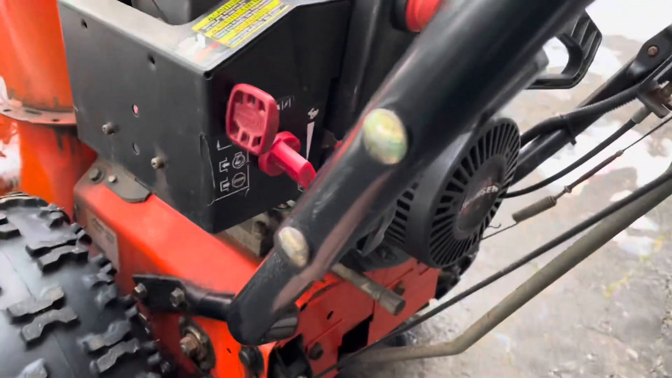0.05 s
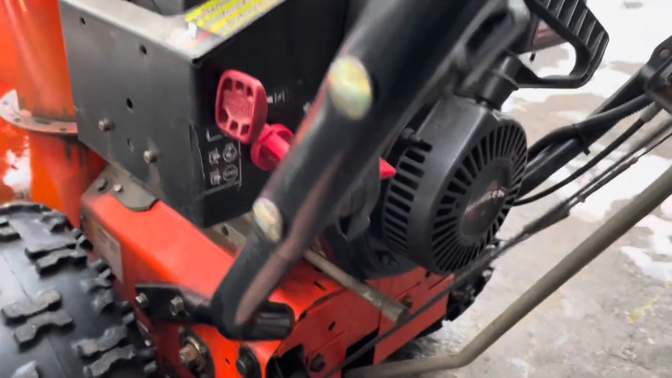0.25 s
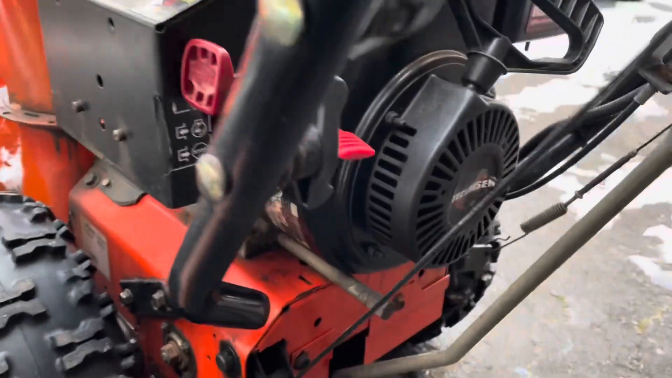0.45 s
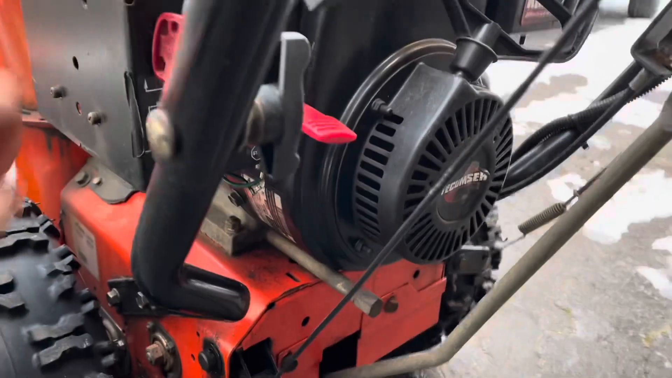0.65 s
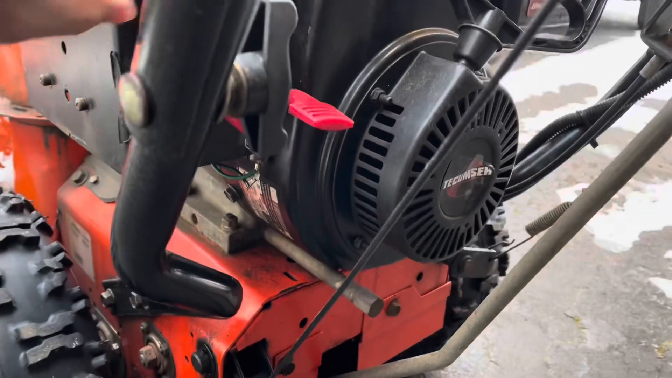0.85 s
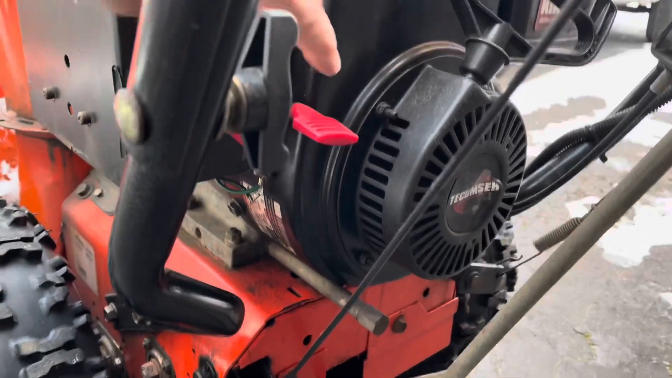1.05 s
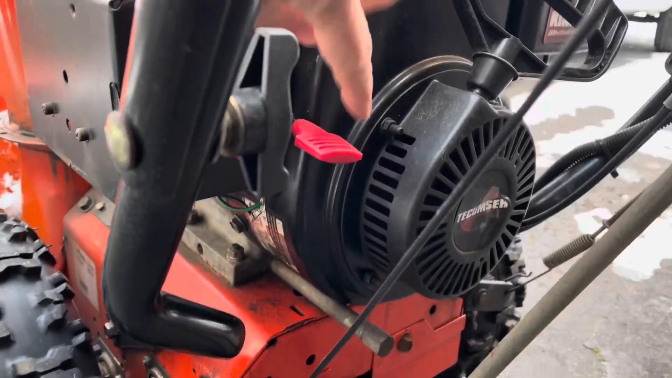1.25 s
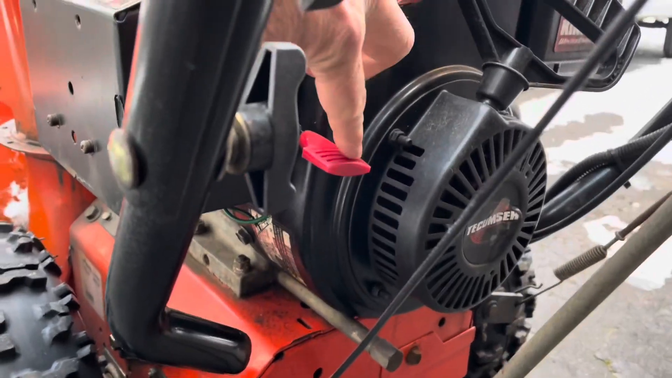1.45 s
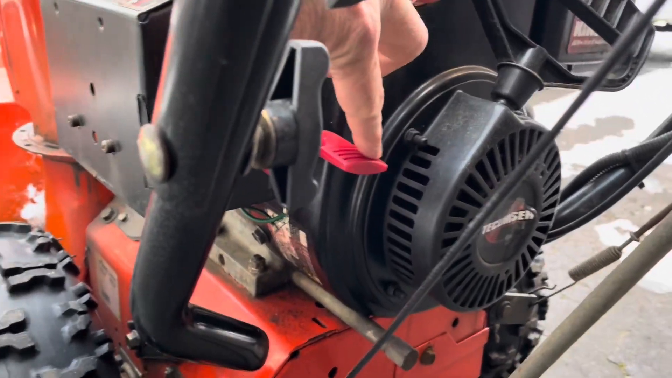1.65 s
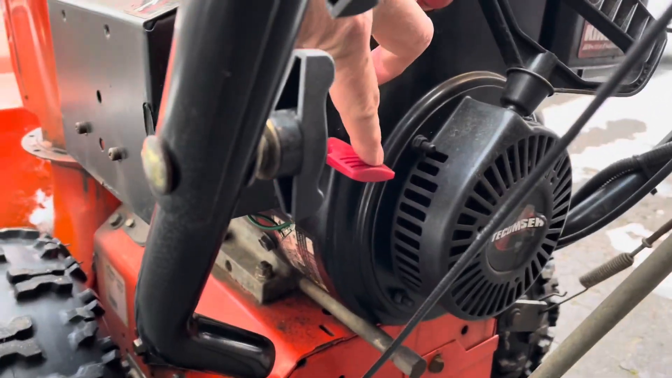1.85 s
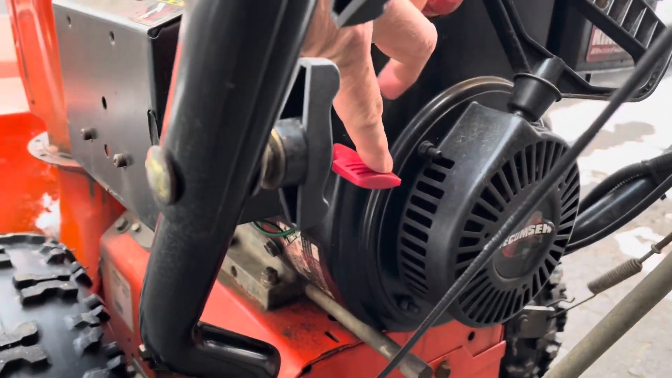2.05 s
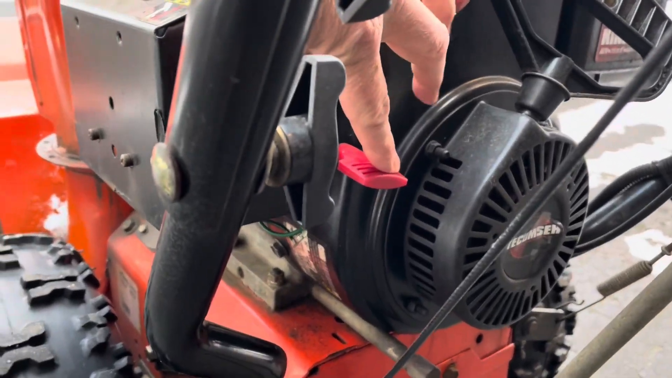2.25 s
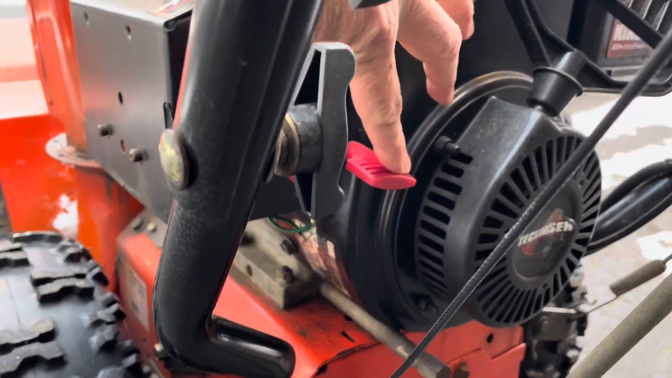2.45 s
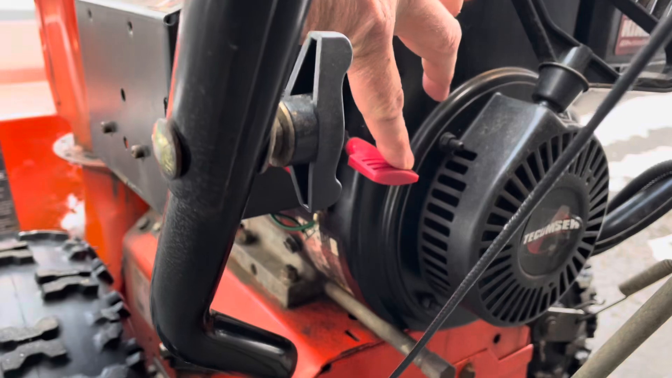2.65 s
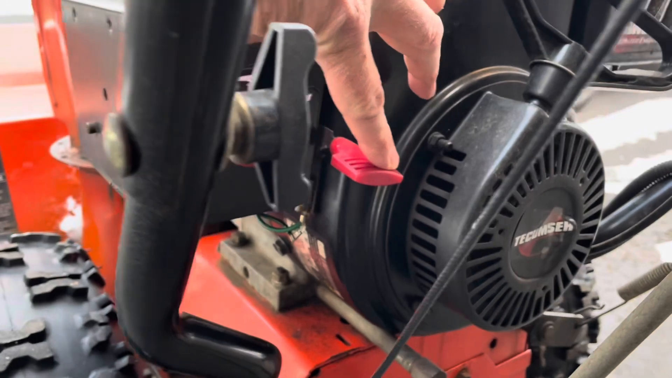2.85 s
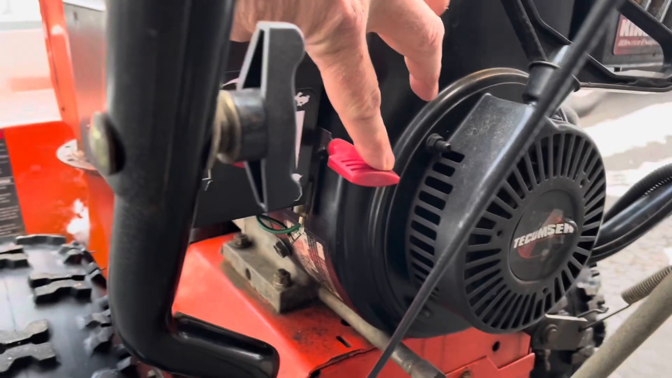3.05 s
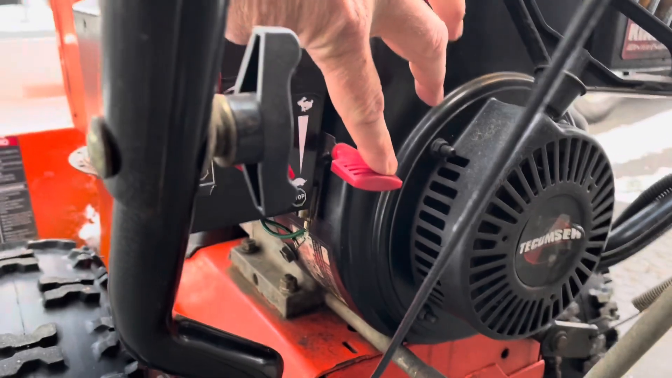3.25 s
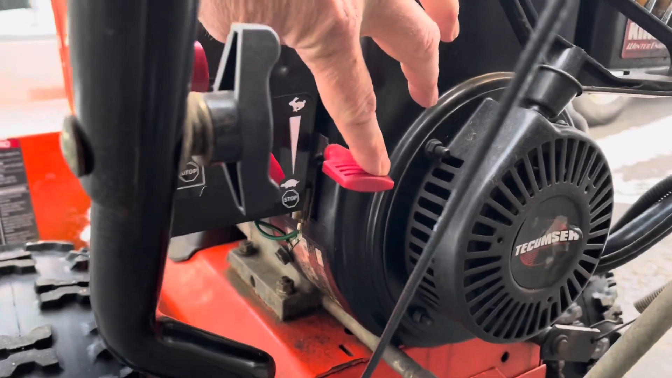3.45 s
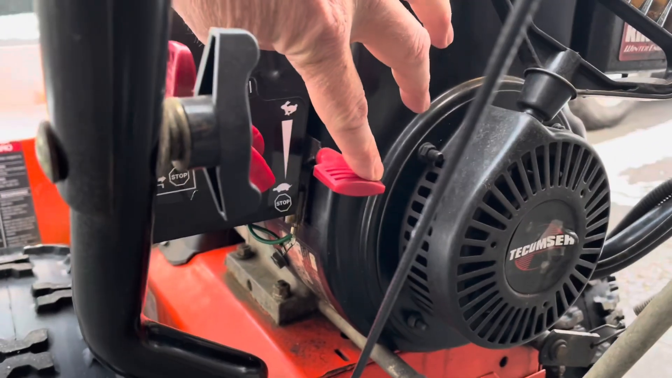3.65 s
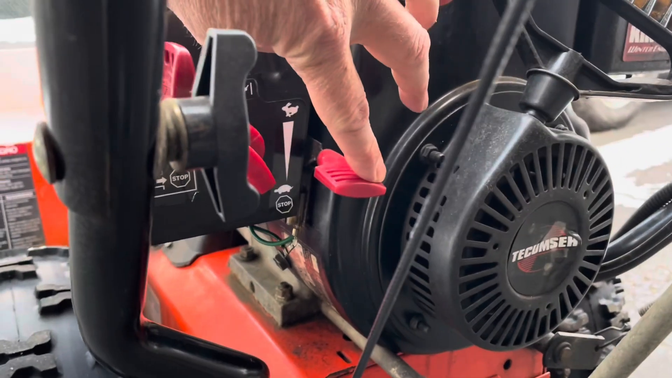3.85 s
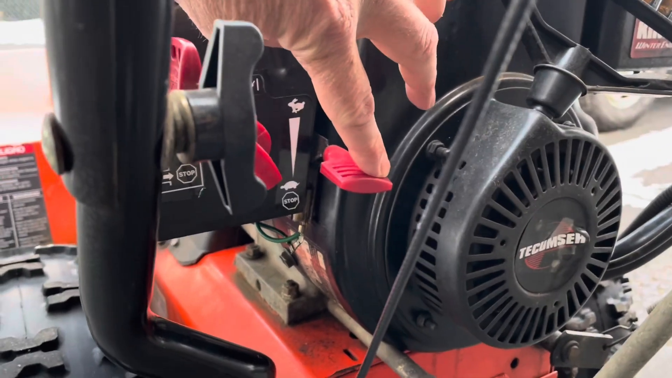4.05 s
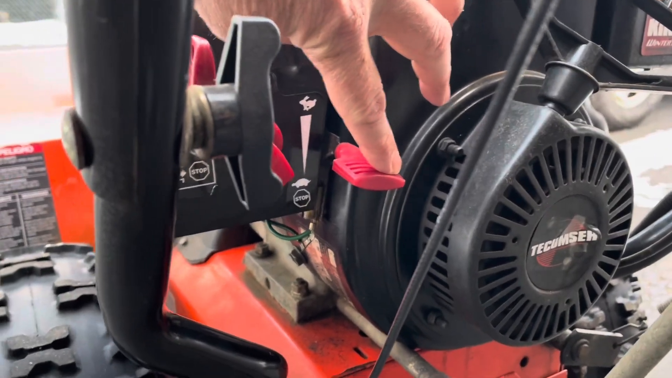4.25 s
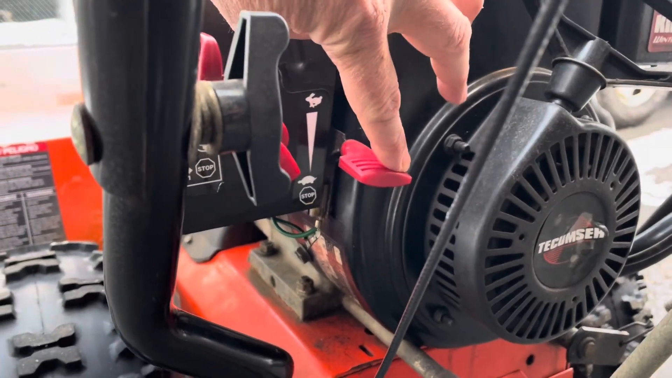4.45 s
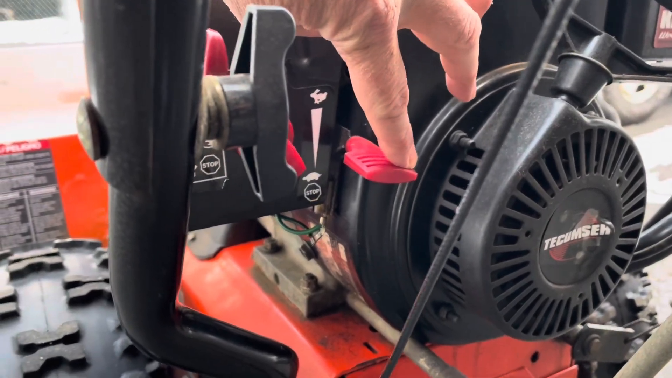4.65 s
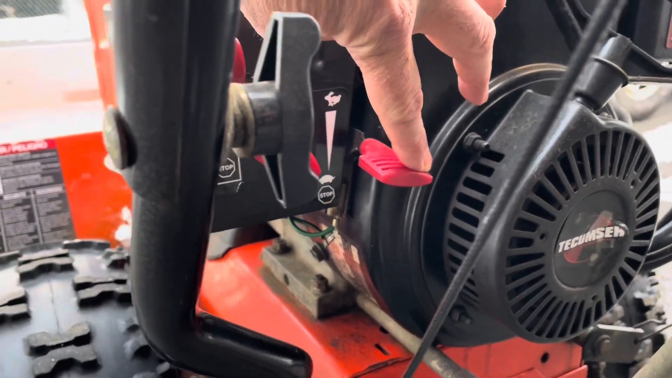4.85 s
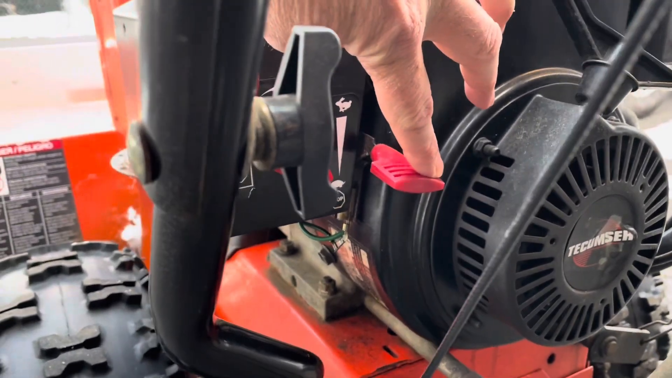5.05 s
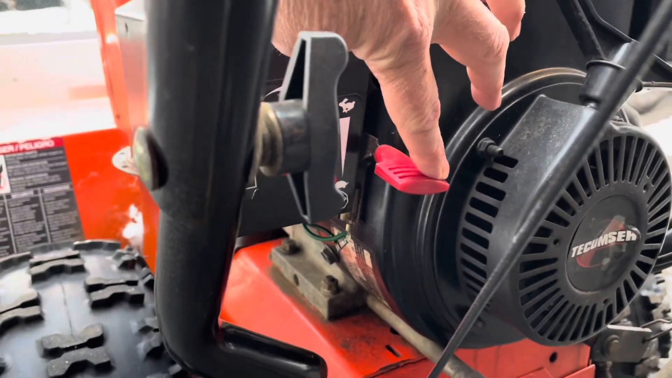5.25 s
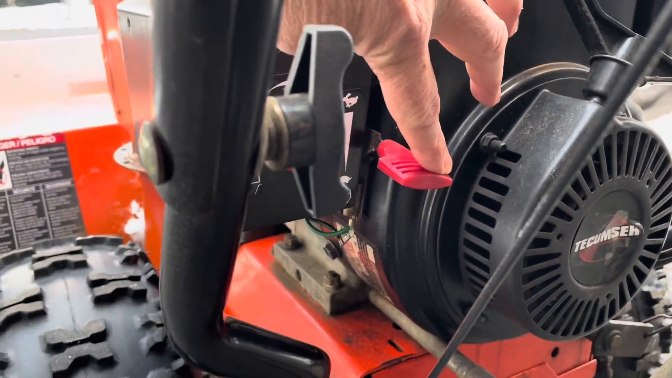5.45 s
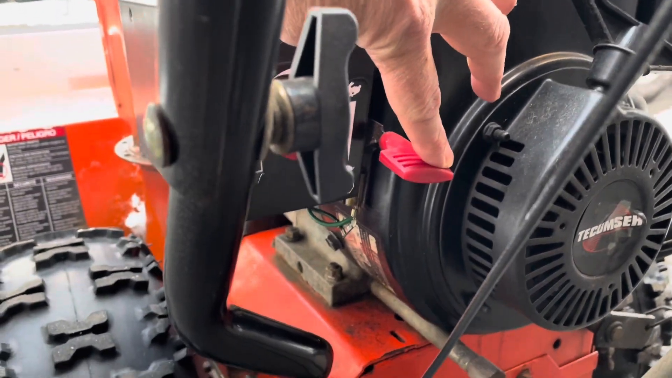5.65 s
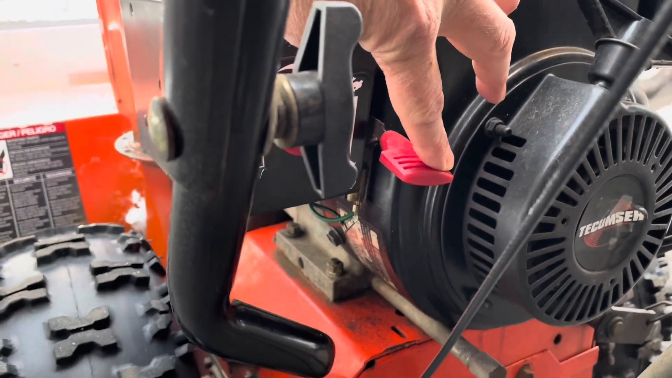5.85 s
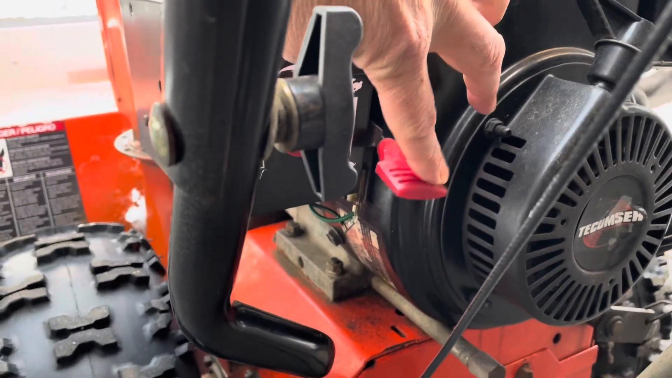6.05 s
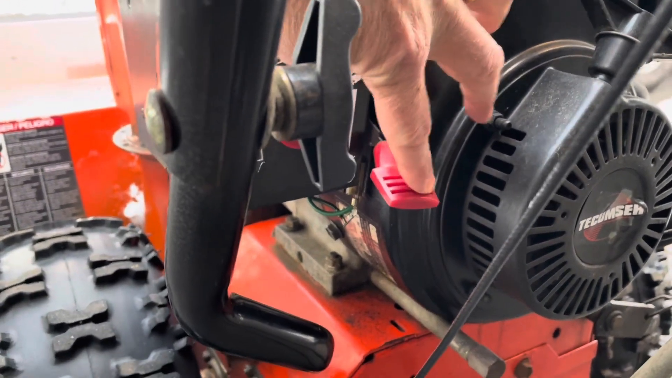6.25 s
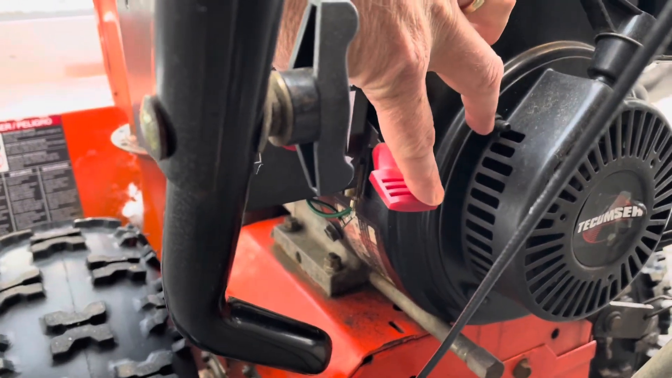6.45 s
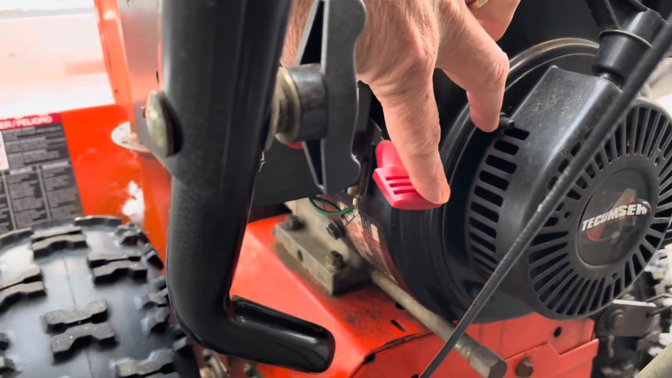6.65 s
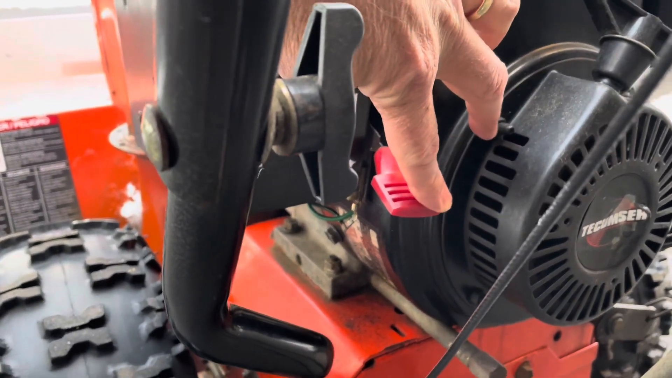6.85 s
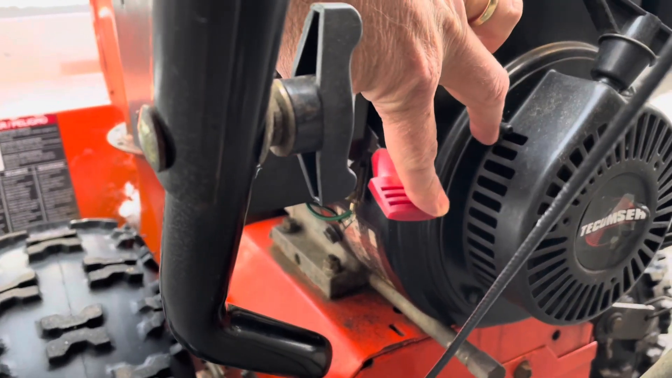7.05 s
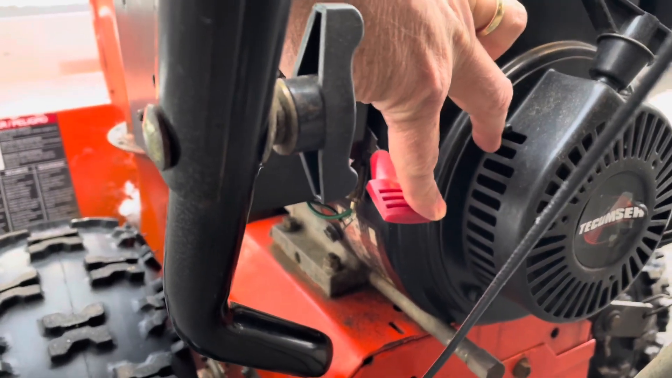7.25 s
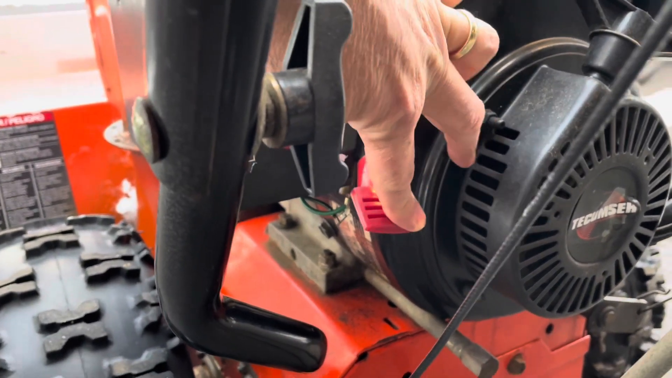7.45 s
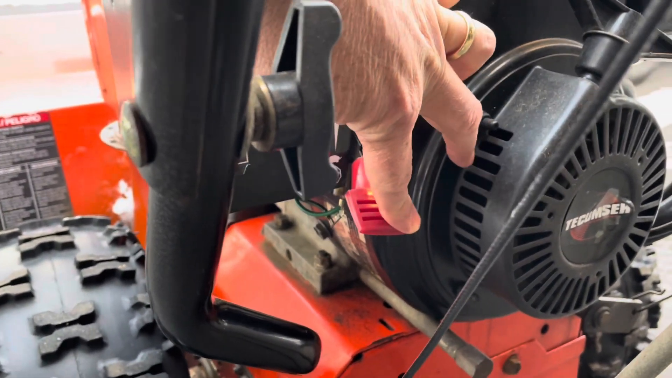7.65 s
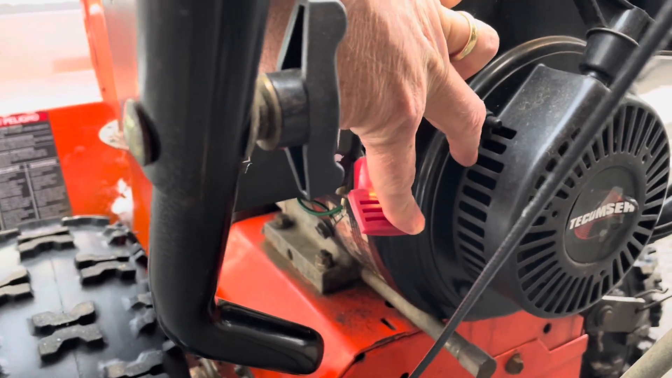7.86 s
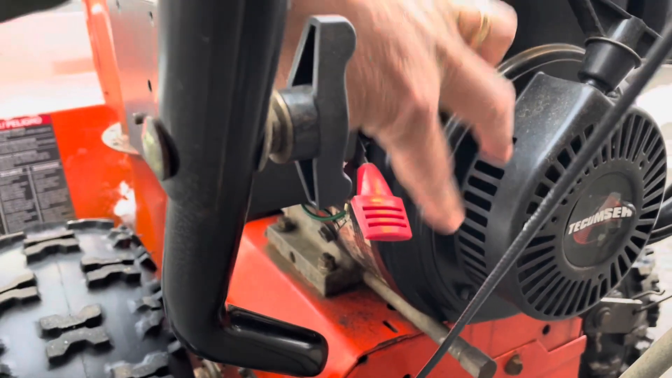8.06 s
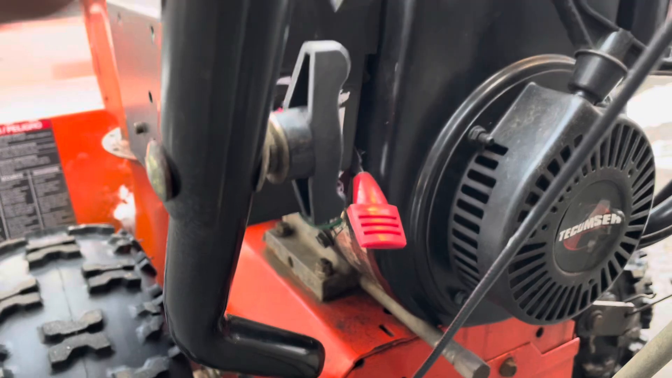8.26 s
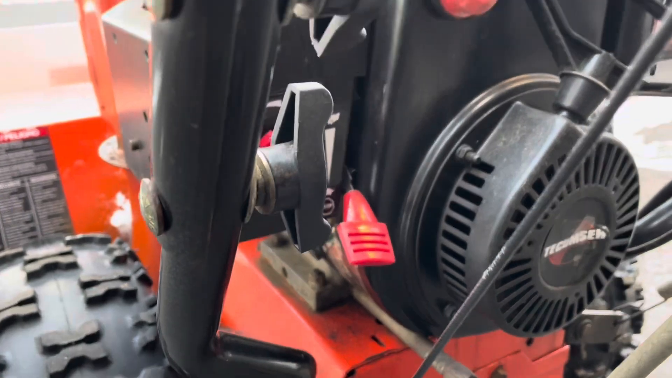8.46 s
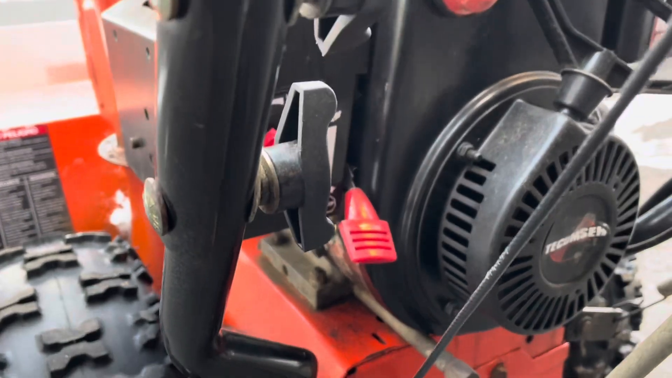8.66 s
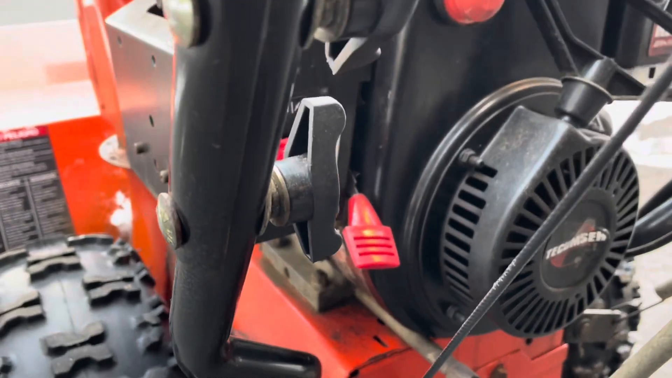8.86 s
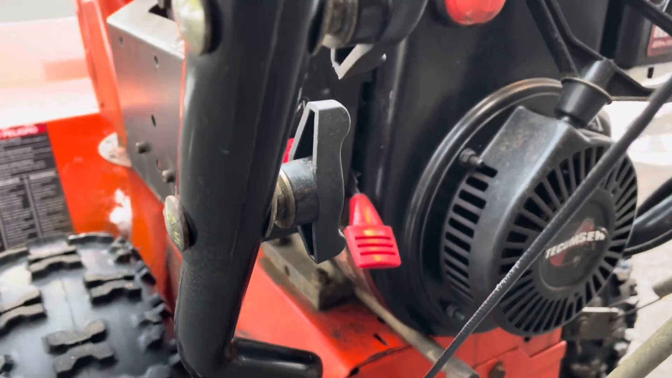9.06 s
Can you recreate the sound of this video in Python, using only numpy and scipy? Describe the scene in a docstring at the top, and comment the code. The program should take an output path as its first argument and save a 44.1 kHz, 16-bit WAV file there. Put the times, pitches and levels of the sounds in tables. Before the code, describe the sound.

Lumpy small-engine idle, popping and rattling with occasional misfires, winds down into spaced breathy puffs, two late sputters, metal knocks and dry clicks.

```python
"""A snowblower's single-cylinder four-stroke engine idles close by, missing a firing now and then.
The throttle lever is pushed to stop: the engine coasts down in slowing chuffs, with two late sputters,
and comes to rest among metal knocks and dry clicks. Each firing is a pressure pulse that barks through
muffler resonances and spits a jet of noise; struck casing modes make the clatter of valve gear and loose
metal, and coloured noise the rush of the cooling fan. Crank speed times and scales these sources."""
import sys
import numpy as np
from scipy import signal
from scipy.fft import rfft, irfft, next_fast_len
from scipy.io import wavfile
from scipy.ndimage import map_coordinates

SR = 44100
rng = np.random.default_rng(int(sys.argv[2]) if len(sys.argv) > 2 else 0)


def waveform_to_disk(signal):
    """Save audio, clipped to [-1, 1], as 16-bit WAV at the path in sys.argv[1]."""
    frames = np.transpose(np.atleast_2d(signal))
    scaled = np.clip(frames, -1, 1) * 32767
    samples = np.round(scaled).astype(np.int16)
    wavfile.write(sys.argv[1], SR, samples)


N = 402191
TIME, HZ = np.arange(N) / SR, np.fft.rfftfreq(2 * N, 1 / SR)
# time within a single event [s]: a quarter and a twentieth of a second long
AGE, BRIEF = TIME[:SR // 4], TIME[:SR // 20]

# crank speed until the ignition is cut at the last row: (time [s], speed [rpm])
CRANK_SPEED = [(0.0, 2051.9), (0.5, 2031.6), (1.6, 1865.7), (2.7, 1890.5), (3.3, 1852.1), (4.25, 1824.7),
               (5.08, 1869.1), (5.72, 1855.9), (6.3, 1922.9), (6.68, 1797.2), (7.03, 1805.6)]
IDLE_RPM = 1860
# late puffs of gas in the muffler: (time [s], relative pop level [dB], relative hiss level [dB])
LATE_PUFFS = [(8.373, -25, 3), (8.605, -27.5, -1)]
# charges that burn lazily and leave as a dull puff: (time [s], share of a full bark)
LAZY_CHARGES = [(.79, 0.86), (1.285, .7), (3.91, 0.8), (4.57, 0.5), (6.365, 0.86), (6.555, 0.9)]
# muffler resonances: (frequency [Hz], width [Hz], level [dB])
MUFFLER_MODES = [(71.7, 8.6, 4), (130.5, 36.4, 4.5), (230.6, 82.5, 8.5), (327.7, 148, 11), (458, 92, 15),
                 (718, 37, 13.5)]
# relative level of the gas hiss: (time [s], level [dB])
HISS_LEVEL = [(0, 0), (.75, 5.5), (1.4, -1.5), (3, 1.5), (5, 2), (5.6, 4), (6.3, 4.5)]


def amp(db):
    """Level and amplitude: decibels become a gain."""
    return 10 ** (np.asarray(db) / 20)


def evened(x):
    """Normalisation: the sound is scaled to an rms of 1."""
    return x / np.sqrt(np.mean(x ** 2) + 1e-20)


def curve(rows, at):
    """Linear interpolation: reads every column of a table along its first."""
    x, *columns = np.transpose(rows)
    return [np.interp(at, x, column) for column in columns]


def colour(points):
    """Spectral envelope: a gain at every frequency, in straight lines of dB over log frequency."""
    hz, db = np.transpose(points)
    return amp(np.interp(np.log(HZ + 1), np.log(hz), db))


def resonance(hz, width, db):
    """Damped resonance: the complex response of one mode, greatest at its own frequency."""
    return amp(db) * 1j * HZ * width / (hz ** 2 - HZ ** 2 + 1j * HZ * width)


def filtered(x, response):
    """Linear filtering: multiplies the spectrum of a sound by a frequency response."""
    size = next_fast_len(N + SR // 2, True)
    gain = np.interp(np.fft.rfftfreq(size, 1 / SR), HZ, response)
    return irfft(rfft(x, size) * gain, size)[..., :N]


def noise(response):
    """Uncorrelated turbulence: two independent noises of one colour."""
    return evened(filtered(rng.standard_normal((2, N)), response))


def add(mix, s, sound):
    """Superposition: mixes a sound in at a time in seconds."""
    part = mix[max(round(s * SR), 0):][:len(sound)]
    part += sound[:len(part)]


def puffs(times, sizes, rise_s):
    """Pressure pulses that swell and die away; a longer time constant gives a softer pulse."""
    out = np.zeros(N)
    for s, size, tau in zip(times, sizes, rise_s * np.ones(len(times))):
        add(out, s, size * (AGE / tau) ** 2 * np.exp(-AGE / tau))
    return out


def crank():
    """Flywheel inertia against dry friction and fan drag: speed as a share of idle, and cycles of two turns."""
    friction_rpm_per_s, drag_per_s = 618.93, .1668
    cycles_before_first_opening = .2862
    coasted = np.maximum(TIME - CRANK_SPEED[-1][0], 0)
    unbraked = curve(CRANK_SPEED, TIME)[0]
    rpm = np.maximum(unbraked * np.exp(-drag_per_s * coasted) - friction_rpm_per_s * coasted, 1)
    return rpm / IDLE_RPM, np.cumsum(rpm) / (2 * 60 * SR) - cycles_before_first_opening


def driven(pace, db, power):
    """Power law of speed: a gain that follows the crank, then fades out from a fixed time near the end."""
    fade_from_s, fade_db_per_s = 8.58, 51
    return amp(db - fade_db_per_s * np.maximum(TIME - fade_from_s, 0)) * pace ** power


def sweep_db(cycle):
    """Piston displacement: the level of gas flow swells and ebbs once in each cycle."""
    top_db, top_share_of_cycle = -6, 0.2
    swell_db_per_cycle, ebb_db_per_cycle = 109, 25.5
    since = (cycle - top_share_of_cycle) % 1
    return top_db - np.minimum(ebb_db_per_cycle * since, swell_db_per_cycle * (1 - since))


def yard(level_db=-56):
    """Ambient noise: a steady random background with a fixed spectrum."""
    # background spectrum: (frequency [Hz], relative density [dB per Hz])
    yard_colour = [(20, -7), (80, 4), (250, -4), (900, -17), (2500, -20), (6000, -24), (11000, -26),
                   (13000, -18), (16000, -32)]
    return amp(level_db) * noise(colour(yard_colour))


def garage(x, t60=0.059, wet_db=-17):
    """Diffuse reverberation: dull scattered echoes from floor and walls, decaying exponentially."""
    taps = rng.standard_normal((2, len(AGE))) * amp(-60 * AGE / t60) * (AGE > .008)
    echo = signal.oaconvolve(x, taps / np.linalg.norm(taps[0]), axes=1)[:, :N]
    return amp(wet_db) * filtered(echo, 1 / (1 + HZ / 5000))


def microphones(x, direct=0.047):
    """Pressure gradient: the difference of two close ports is a quarter cycle off their sum, partly diffuse."""
    # response to the sum of the ports: (frequency [Hz], level [dB])
    sum_response = [(25, -12), (42, 2.5), (7000, -0.5), (8200, -4.5), (9100, -19.5), (10000, -0.5),
                    (11000, -2)]
    # response to the difference of the ports: (frequency [Hz], level [dB])
    difference_response = [(30, -36), (120, -16), (300, -18.5), (700, -6.5), (1200, -8.5), (2500, -2.5),
                           (5000, -4), (7500, 1), (9500, 6), (11500, -3), (13000, -29)]
    # how much louder the left port is than the right: (frequency [Hz], level [dB])
    left_over_right = [(60, -1), (120, 0.5), (240, 1.5), (480, -0.5), (950, 1.0), (1890, -1.0), (3770, 2),
                       (7520, 1.0), (15000, -0.5)]
    mid = filtered(x[0], colour(sum_response))  # deep bass and a notch in the treble are lost
    mixed = direct * x[0] + np.sqrt(1 - direct ** 2) * x[1]
    side = filtered(mixed, 1j * colour(difference_response))
    lean = np.sqrt(colour(left_over_right))
    return np.array([filtered(mid + side, lean), filtered(mid - side, 1 / lean)])


def fan(pace, level_db=-31.5, power=1.55):
    """Aerodynamic noise: the cooling fan's broadband rush falls with a power of its speed."""
    # fan spectrum: (frequency [Hz], relative density [dB per Hz])
    fan_colour = [(20, 2.5), (55, 19.5), (280, -1), (480, 10.5), (610, 4.5), (880, 2.5), (1100, 2.5),
                  (1850, -2), (2300, -10), (3600, -8.5), (6500, -12.5), (10500, -19), (13200, -12.5),
                  (16000, -27)]
    return driven(pace, level_db, power) * noise(colour(fan_colour))


def whine(pace, level_db=-53, power=18):
    """Narrow resonance: shroud tones whose steep speed law leaves them audible mainly above idle."""
    # tones of the shrouds: (frequency [Hz], width [Hz], relative level [dB])
    tones = [(628, 51, -5.5), (700, 6.7, -1.5), (860, 6.7, 2.5)]
    response = sum(amp(tone_db) * resonance(hz, width, 0) ** 2 for hz, width, tone_db in tones)
    return driven(pace, level_db, power) * noise(response)


def shake(pace, cycle, hum_db=-34, lag_cycles=0.017):
    """Reciprocating imbalance: the piston shakes the frame twice in every turn, four times in a cycle."""
    # the lag is in cycles of the hum itself
    return driven(pace, hum_db, power=1.5) * np.cos(2 * np.pi * (4 * cycle - lag_cycles))


def casing_ring(tick=0.3, uneven_db=3, detune=0.0076):
    """Modal response: one blow rings the casing's modes, and each spot favours other modes."""
    # modes of the engine block and its shrouds: (frequency [Hz], level [dB], t60 [s])
    casing = [(540, -20, 0.069), (688, -12, 0.088), (812, -6.5, 0.03), (874, 4.5, 0.028), (951, -4.5, 0.12),
              (1195, -3.5, 0.064), (1423, -7, 0.052), (1623, -4, 0.038), (1820, -2.5, 0.06),
              (1977, -9.5, 0.062), (2200, -13, 0.086), (2440, -7, 0.038), (3597, -13.5, 0.088),
              (5200, -9, 0.054)]
    hz, db, t60 = np.transpose(casing)[:, :, None]
    size, shift, phase = rng.standard_normal((3, len(casing), 1))
    decay = amp(db + uneven_db * size - 60 * AGE / t60)
    modes = decay * np.sin(2 * np.pi * (hz * (1 + detune * shift) * AGE + phase))
    ring = modes.sum(0) + tick * rng.standard_normal(len(AGE)) * np.exp(-AGE / 0.0012)
    return ring / np.linalg.norm(ring)


def metal(pace, cycle, rattles_per_s=420, clank_db=16, surge=0.3, dull_hz=2500, spots=8):
    """Impact excitation: loose parts and stray knocks strike the casing; slow blows are duller."""
    # loose metal knocks, most of them as the crank slows and rocks back: (time [s], relative level [dB])
    clanks = [(3.65, -20), (4.371, -22), (5.729, -19.5), (6.174, -17.5), (6.238, -22), (7.424, -52),
              (7.508, -36), (7.599, -29), (7.763, -27), (7.994, -24), (8.131, -27), (8.178, -22.5),
              (8.291, -22), (8.318, -24.5), (8.348, -27), (8.494, -30.5), (8.519, -31), (8.569, -30),
              (8.654, -36), (8.896, -30)]
    rattle_db, rattle_power = -36, 0.43
    blows = np.zeros(N)
    for s, db in clanks:
        for delay, bounce_db in ((0, 5), (.003, 1), (.008, -15.5)):  # each knock bounces
            blows[round((s + delay) * SR)] += amp(db + clank_db + bounce_db)
    loose = rng.standard_normal(N) * (rng.random(N) < rattles_per_s / SR)
    surging = evened(loose * amp(surge * sweep_db(cycle)))  # parts chatter most just after the jolt
    blows += driven(pace, rattle_db, rattle_power) * surging
    spot = rng.integers(0, spots, N)[np.arange(N) // 256]
    ring = np.zeros((2, N))
    for side in ring:
        for k in range(spots):
            side += signal.oaconvolve(blows * (spot == k), casing_ring())[:N]
    dull = filtered(ring, 1 / (1 + (HZ / dull_hz) ** 6))
    return dull + np.minimum(pace, 1) * (ring - dull)


def chatter(times, level_db, lag_s=.0135, spread_s=.007, hz=2800, octaves=0.55, t60=0.028,
            uneven_db=4, count=3):
    """Damped free vibration: after each jolt loose covers knock a few times, each with other tones."""
    out = np.zeros((2, N))
    for s in np.repeat(times, count):
        at = s + lag_s + spread_s * rng.exponential()
        tone, level, *phases = rng.standard_normal((4, count, 1))
        size = amp(level_db + uneven_db * np.tanh(level) - 60 * BRIEF / t60)
        for side, phase in zip(out, phases):
            modes = size * np.sin(2 * np.pi * (hz * 2 ** (octaves * tone) * BRIEF + phase))
            add(side, at, modes.sum(0))
    return out


def last_ticks(rise_s=0.0029, tail_db=-17, tail_rise_s=0.019):
    """Impact noise: slack in the drive is taken up with dry clicks as the crank rocks back."""
    # clicks as the crank comes to rest: (time [s], relative level [dB])
    ticks = [(8.566, -28), (8.827, -33), (8.888, -31), (8.918, -55), (9.03, -50)]
    # spectrum of the clicks: (frequency [Hz], relative density [dB per Hz])
    tick_colour = [(400, -9), (800, 0), (1000, -2), (1350, 5.5), (1900, -16), (2350, -1), (2800, -15),
                   (3300, -15), (7000, -31), (16000, -21)]
    s, db = np.transpose(ticks)
    envelope = puffs(s, amp(db), rise_s) + puffs(s, amp(db + tail_db), tail_rise_s)
    return noise(colour(tick_colour)) * envelope


def valve_gear(openings, pace, dull_hz=5000, scatter_db=3, jitter_s=0.0006, rise_s=0.00074, breadth=0.43,
               gear_db=2, power=0.25, dry_db=-3, ring_db=-14):
    """Periodic impacts: cams, tappets and seats tick at fixed points of the cycle and ring the casing."""
    # ticks: (share of the cycle after the exhaust valve opens, relative level [dB], tone [Hz])
    tappets = [(0.02, -38, 1670), (0.265, -20.5, 750), (0.27, -24, 1960), (0.41, -34, 1400),
               (0.51, -29.5, 1730), (0.59, -31, 1630), (0.64, -26, 900), (0.65, -32, 12000),
               (0.7, -32, 990), (0.82, -31, 1870), (0.91, -33, 2200)]
    out = np.zeros((2, N))
    f = np.fft.rfftfreq(len(BRIEF), 1 / SR)
    shape = (BRIEF / rise_s) ** 2 * np.exp(-BRIEF / rise_s)
    for share, db, hz in tappets:
        early, size = rng.standard_normal((len(openings) - 1, 2)).T
        times = openings[:-1] + share * np.diff(openings) + jitter_s * early
        band = 1 / (1 + (np.log((f + 1) / hz) / breadth) ** 4) ** .5
        grain = rng.standard_normal((len(times), 2, len(BRIEF)))
        ticks = shape * evened(irfft(band * rfft(grain), len(BRIEF)))
        # a slow valve seats softly: bright ticks fade first
        force = np.interp(times, TIME, pace) ** (hz / dull_hz)
        gains = force * amp(db + scatter_db * np.tanh(size))
        for s, gain, tick in zip(times, gains, ticks):
            for side, sound in zip(out, tick):
                add(side, s, gain * sound)
    ring = np.array([signal.oaconvolve(side, casing_ring())[:N] for side in out])
    return driven(pace, gear_db, power) * (amp(dry_db) * out + amp(ring_db) * ring)


def firings(times):
    """Incomplete combustion: how well each charge burns, and the chuff of one that fails."""
    # cycles that fail to burn fully: (time [s], share of a full bark, relative chuff level [dB])
    misfires = [(.67, 0.067, -7.5), (.97, 0.1, -7), (1.1, 0.026, -14), (3.13, 0.48, -3.5), (3.39, 0.12, -7),
                (3.52, 0.57, -4), (4.44, 0.089, -7), (5.21, 0.43, -8), (6.11, 0.13, -7), (6.62, 0.59, -4)]
    skipping_from_s, skipping_to_s, skip_share, skip_chuff_db = 5.5, 5.95, 0.11, -7
    burn, chuff = np.ones(len(times)), np.zeros(len(times))
    for s, share in LAZY_CHARGES:
        burn[np.argmin(abs(times - s))] = share
    for s, share, db in misfires:
        k = np.argmin(abs(times - s))
        burn[k], chuff[k] = share, amp(db)
    # for a moment only every other cycle fires fully
    skipped = np.flatnonzero((times > skipping_from_s) & (times < skipping_to_s))[::2]
    burn[skipped], chuff[skipped] = skip_share, amp(skip_chuff_db)
    return burn, chuff


def vigour(times, uneven_db=2.5, lazy_db=-12):
    """Cyclic variation: how sharply each charge bursts out, in dB."""
    # firings that spit harder or softer than the rest: (time [s], level [dB])
    uneven_firings = [(.02, 9), (.55, 2), (1.22, 3), (1.86, 2.5), (2.18, -1), (2.24, 3.5), (2.364, 5),
                      (2.69, 2.5), (2.746, 1), (2.809, 3), (2.94, -1.5), (3.065, 1), (3.2, -3), (3.715, 0),
                      (3.78, 1.5), (4.04, 1), (4.24, -3), (4.369, 3), (4.51, 3), (4.695, 3), (4.825, 0),
                      (4.889, 2.5), (4.96, 1), (5.02, -5), (5.09, -3), (5.404, 1), (5.467, 1.5),
                      (5.598, 4.5), (5.99, 1), (6.236, 0), (6.3, -3), (6.424, 0.5), (6.818, 0.5),
                      (6.885, 0), (7.019, 2)]
    db = uneven_db * rng.standard_normal(len(times))
    for s, spit_db in uneven_firings:
        db[np.argmin(abs(times - s))] = spit_db
    for s, _ in LAZY_CHARGES:
        db[np.argmin(abs(times - s))] = lazy_db
    return db


def chuffs(times, sizes, pace, hz=62, sag_hz=66, sag_s=0.0055, swell_s=0.0041, fade_s=0.011, lag_s=0.00973,
           ring_db=-9, sigh_db=-14, sigh_hz=280):
    """Damped oscillation: unburnt, air is sucked back, swings out at a falling pitch, then sighs."""
    t, out = AGE - 2 * lag_s, np.zeros(N)
    sag = np.where(t < 0, t, sag_s * (1 - np.exp(-abs(t) / sag_s)))
    swing = np.cos(2 * np.pi * (hz * t + sag_hz * sag))
    for s, size, speed in zip(times, sizes, np.interp(times, TIME, pace)):
        # a slow crank sucks for a shorter while
        shape = np.exp(-np.where(t < 0, (t / swell_s) ** 2 / (speed + 0.06), t / fade_s))
        add(out, s - lag_s, size * shape * swing)
    sigh = noise(resonance(sigh_hz, 335, 0) ** 2) * puffs(times + 0.013, sizes, rise_s=0.0037)
    outlet = 1j * HZ / (22 + 1j * HZ) + resonance(*MUFFLER_MODES[0][:2], ring_db)
    return 0.64 * filtered(out, outlet) + amp(sigh_db) * sigh


def splutter(hz=680, width=500, lead_s=0.011, rise_s=.0045, gain_db=2):
    """Resonant flow noise: each late puff starts with a hollow rush of gas through the muffler."""
    s, pop_db, _ = np.transpose(LATE_PUFFS)
    return noise(resonance(hz, width, 0) ** 2) * puffs(s - lead_s, amp(pop_db + gain_db), rise_s)


def pipe_ring(times, sizes, pipe, lag_s=0.0005, uneven_db=4, detune=0.029, glide=0.052, glide_s=0.0037,
              rise_s=0.0052):
    """Standing waves: pitch sags at the start of each burst, and each mode is randomly detuned a little."""
    hz, db, t60 = np.transpose(pipe)[:, :, None]
    sagging = BRIEF + glide * glide_s * (1 - np.exp(-BRIEF / glide_s))
    out = np.zeros(N)
    for s, size in zip(times, sizes):
        level, shift, phase = rng.standard_normal((3, len(pipe), 1))
        decay = amp(db + uneven_db * np.tanh(level) - 60 * BRIEF / t60)
        modes = decay * np.sin(2 * np.pi * (hz * (1 + detune * shift) * sagging + phase))
        add(out, s + lag_s, size * modes.sum(0) * (1 - np.exp(-BRIEF / rise_s)))
    return out


def port_jet(port):
    """Jet turbulence: broadband noise is coloured by the resonances of the exhaust port."""
    # jet spectrum: (frequency [Hz], relative density [dB per Hz])
    jet_colour = [(100, 13.5), (400, 13), (600, 1.5), (900, -3), (1300, -3), (2300, -6.5), (3500, -2),
                  (4600, -14.5), (7000, -10.5), (10500, -17.5), (13500, -14.5), (16000, -24)]
    return noise(colour(jet_colour) * abs(1 + sum(resonance(*mode) for mode in port)))


def bent(x, starts, glide=0.1, glide_s=0.0081, scatter=0.02):
    """Changing resonance: the port's tones slide up as the valve lifts, a little differently in each stroke."""
    stroke = np.maximum(np.searchsorted(starts, TIME) - 1, 0)
    lift = 1 - np.exp(-np.maximum(TIME - starts[stroke], 0) / glide_s)
    rate = 1 + glide * (lift - .5) + scatter * rng.standard_normal(len(starts))[stroke]
    return np.array([map_coordinates(side, [np.cumsum(rate) % (N - 1)], order=3) for side in x])


def swept_flow(times, spit_db, pace, cycle, flow_db=-26.0, gust_share=0.44):
    """Displacement flow: the piston sweeps out the remaining gas, and the flow fades as it slows."""
    # spectrum of the slower flow: (frequency [Hz], relative density [dB per Hz])
    sweep_colour = [(100, 10.5), (380, 8.5), (600, 0), (850, 4), (1300, -10), (2300, -2), (3500, -1),
                    (4600, -8.5), (7000, -7.5), (10500, -19), (13500, -9), (16000, -30)]
    gust_db = gust_share * np.interp(TIME, times, spit_db, right=0)  # a fuller charge also flows harder
    level_db = flow_db + sweep_db(cycle) + curve(HISS_LEVEL, TIME)[0] + gust_db
    return driven(pace, level_db, power=1.4) * noise(colour(sweep_colour))


def wheezes(times, unburnt, coast, pace, lead_s=0.003, rise_s=0.0023, coast_db=7, coast_power=0.41,
            stretch_power=0.31, rebound_s=0.012, rebound_db=-7, late_db=6.5, late_rise_s=0.0071):
    """Low-pressure discharge: the envelope of long breaths from unlit strokes and late puffs."""
    stroke = amp(coast_db) * np.interp(coast, TIME, pace) ** coast_power
    slow = np.interp(coast, TIME, pace + .05) ** -stretch_power  # a slow valve stays open longer
    out = puffs(coast - lead_s * slow, stroke, rise_s * slow)
    # air rushes in, then out again
    out += pace * puffs(coast + rebound_s, amp(rebound_db) * stroke, rise_s)
    out += puffs(times + .003, unburnt, rise_s=.0018) + puffs(times + .014, unburnt, rise_s=.0022)
    late, _, hiss_db = np.transpose(LATE_PUFFS)
    return out + puffs(late + 0.0018, amp(hiss_db + late_db), late_rise_s)


def gas(times, burn, spit_db, coast, pace, cycle, hot_db=-19, cold_db=-27, coast_jet_db=-21, miss_db=-1,
        spit_lead_s=0.0023, spit_rise_s=0.0021, wheeze_lead_s=0.003, ragged_share=0.98):
    """Valve throttling: a jet spits past the opening valve; then the piston sweeps out the rest."""
    # exhaust port resonances in hot gas: (frequency [Hz], width [Hz], level [dB])
    hot_port = [(1895, 59, 8), (3280, 1500, -6.5), (4980, 400, 10.5), (6480, 210, 4.5), (12800, 5100, 3.5)]
    # exhaust port resonances in cold air: (frequency [Hz], width [Hz], level [dB])
    cold_port = [(1355, 68, 32.7), (2820, 110, 19.4), (3100, 48, 3.8), (4430, 70, 32), (6450, 570, 3.8),
                 (13300, 7300, 19.5)]
    hot, cold = port_jet(hot_port), port_jet(cold_port)
    strength = amp(curve(HISS_LEVEL, times)[0] + spit_db)
    spit = puffs(times - spit_lead_s, strength * burn, spit_rise_s)
    unburnt = amp(miss_db) * strength * (1 - burn) ** 2
    wheeze = wheezes(times, unburnt, coast, pace, wheeze_lead_s)
    late = np.transpose(LATE_PUFFS)[0]
    cold = bent(cold, np.sort(np.concatenate([times, coast, late])) - wheeze_lead_s)
    ragged = np.clip(pace * ragged_share, 0, 1)  # slower strokes ring the port more clearly
    breathy = amp(coast_jet_db) * ragged * hot + amp(cold_db) * (1 - ragged) * cold
    return hot * amp(hot_db) * spit + swept_flow(times, spit_db, pace, cycle) + breathy * wheeze


def crack(times, sizes, delay_s=0.00258, rise_s=0.000091):
    """Shell vibration: the first edge of each burst raps the muffler's shell, just ahead of the bark."""
    # resonances of the muffler's shell: (frequency [Hz], width [Hz], level [dB])
    shell = [(764, 96, 8), (1400, 300, -5.5)]
    return filtered(puffs(times + delay_s, sizes, rise_s), sum(resonance(*mode) for mode in shell))


def barks(times, burn, sharp_db, soften=0.053, delay_s=0.003687, rise_s=0.00086, uneven=0.013, rough=0.15):
    """Cavity resonance: turbulent bursts of gas drive the muffler's modes; a lazy burst is rounder."""
    # sign with which each muffler mode reaches the outlet: one column [+1 or -1]
    signs = [1, -1, -1, 1, 1, 1]
    size, width = rng.standard_normal((len(times), 2)).T
    rises = rise_s * np.exp(uneven * width) * amp(-soften * np.minimum(sharp_db, 0))
    drive = puffs(times + delay_s, burn * amp(0.09 * size), rises)
    s, pop_db, _ = np.transpose(LATE_PUFFS)
    pops = puffs(s, amp(pop_db + 6), rise_s=0.0002)
    pops += puffs(s + 0.00695, amp(pop_db + 17), rise_s=0.0029)
    muffler = sum(sign * resonance(*mode) for sign, mode in zip(signs, MUFFLER_MODES))
    radiated = (1j * HZ / (35 + 1j * HZ)) ** 2  # a small outlet radiates little deep bass
    return filtered((drive + pops) * (1 + rough * rng.standard_normal(N)), muffler * radiated)


def scene(crack_share=0.27):
    """Crank timing: the exhaust valve opens every second turn and sets exhaust and clatter going."""
    # modes of the hot gas in the exhaust pipe: (frequency [Hz], level [dB], t60 [s])
    hot_pipe = [(1657, -31.5, 0.029), (3490, -32.5, 0.053), (5120, -31, 0.046), (6700, -27.5, 0.033)]
    # modes of the cold air in the pipe while coasting: (frequency [Hz], level [dB], t60 [s])
    cold_pipe = [(1400, -19, 0.053), (2880, -14.5, 0.06), (3340, -22, 0.034), (4610, -25.5, 0.054)]
    coast_chuff_db, coast_chuff_power = -6, 0.71
    far_db, near_s = -4, 4.78  # the microphone creeps up: starting level, time of arrival
    pace, cycle = crank()
    openings = TIME[1:][np.diff(np.floor(cycle)) > 0]
    last_lit = np.searchsorted(openings, CRANK_SPEED[-1][0]) + 1  # the last lit charge still leaves
    times, coast = np.split(openings, [last_lit])
    burn, chuff = firings(times)
    coast_chuff = amp(coast_chuff_db) * np.interp(coast, TIME, pace) ** coast_chuff_power
    sharp_db = vigour(times)

    rush_and_hum = fan(pace) + whine(pace) + shake(pace, cycle)
    clatter = valve_gear(openings, pace) + metal(pace, cycle) + last_ticks()
    clatter += chatter(times, level_db=-38)
    clatter += pace * chatter(coast, level_db=-41, lag_s=.012, spread_s=0.021, hz=2200, count=7)
    exhaust = barks(times, burn, sharp_db) + crack(times, burn * amp(crack_share * sharp_db))
    exhaust = exhaust + gas(times, burn, sharp_db, coast, pace, cycle) + splutter()
    exhaust += pipe_ring(times, burn * amp(sharp_db), hot_pipe) + pipe_ring(coast, coast_chuff, cold_pipe)
    exhaust += chuffs(times + 0.0037, chuff, pace) + chuffs(coast, coast_chuff, pace)

    nearness = amp(far_db * np.maximum(1 - TIME / near_s, 0))
    engine = nearness * (rush_and_hum + clatter + exhaust)
    return microphones(engine + garage(engine) + yard())


def record(dry):
    """Saturation and band limiting: the loudest peaks are rounded off softly, then the top is cut."""
    edge_hz = 15900
    rounded = dry / (1 + (dry / .95) ** 8) ** (1 / 8)
    lowpass = signal.firwin(511, edge_hz, window=("kaiser", 9), fs=SR)
    return signal.oaconvolve(rounded, lowpass[None], "same")


dry = scene()
out = record(dry)
waveform_to_disk(out)
```